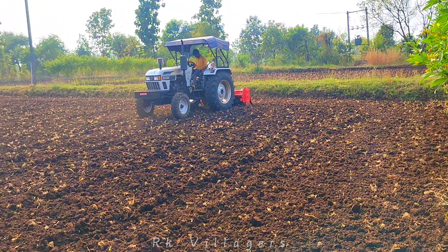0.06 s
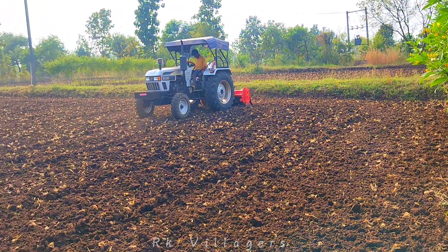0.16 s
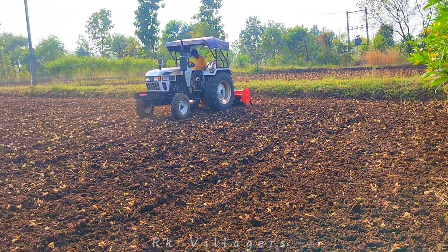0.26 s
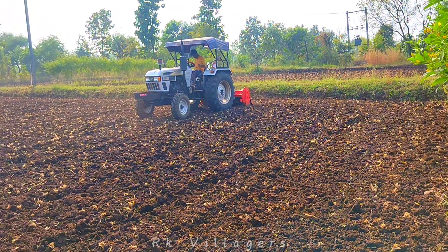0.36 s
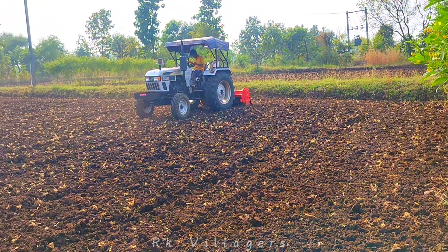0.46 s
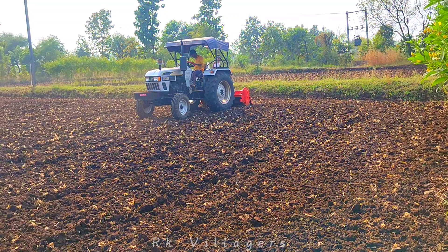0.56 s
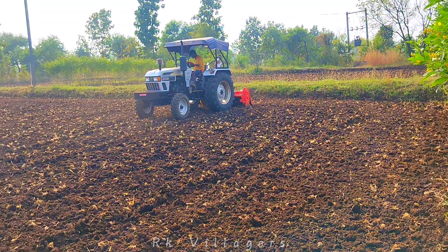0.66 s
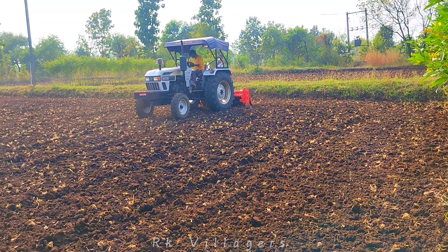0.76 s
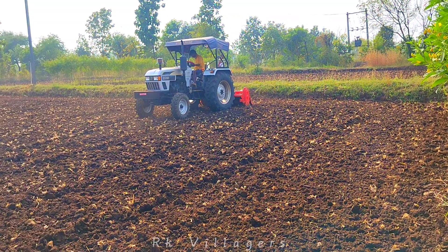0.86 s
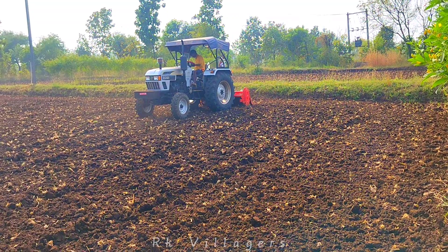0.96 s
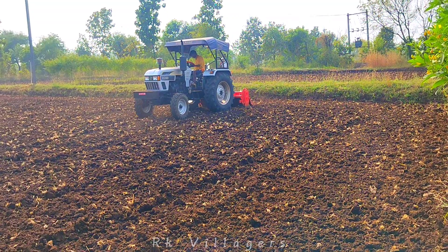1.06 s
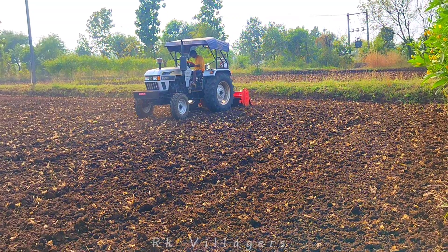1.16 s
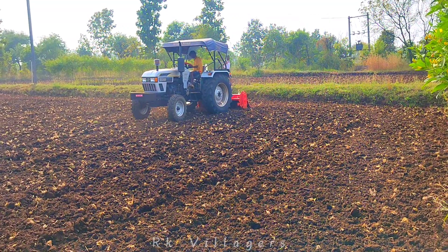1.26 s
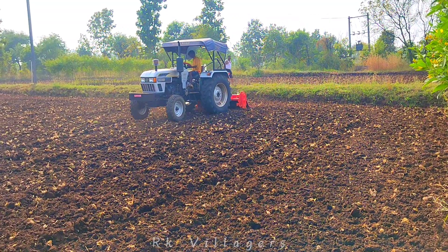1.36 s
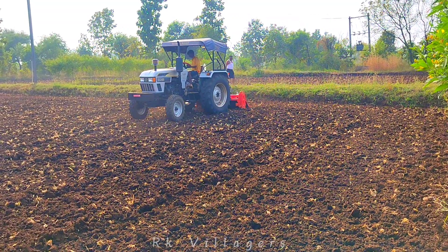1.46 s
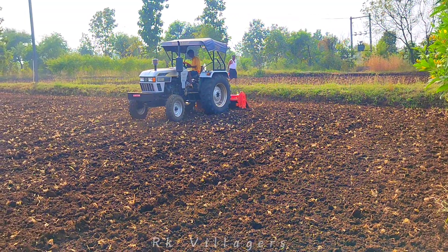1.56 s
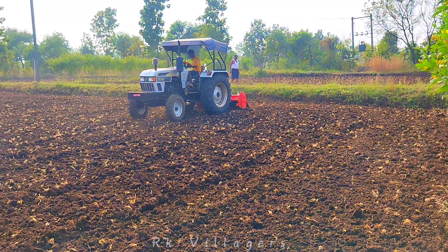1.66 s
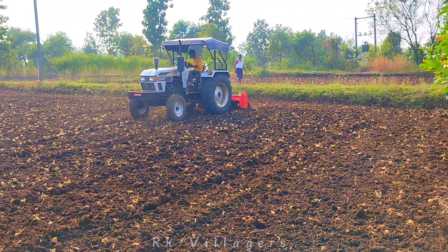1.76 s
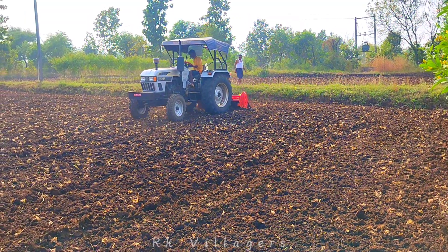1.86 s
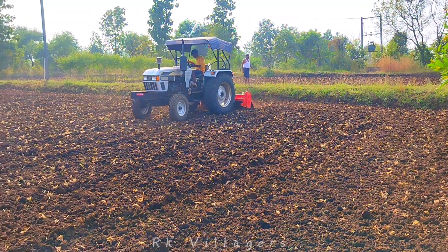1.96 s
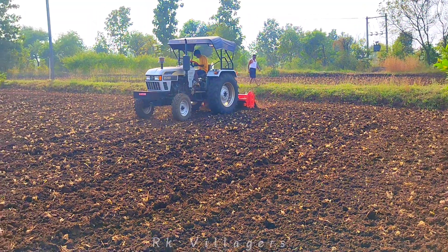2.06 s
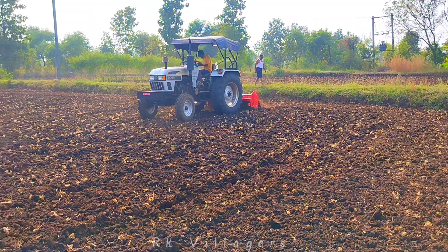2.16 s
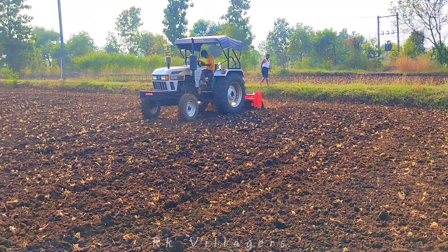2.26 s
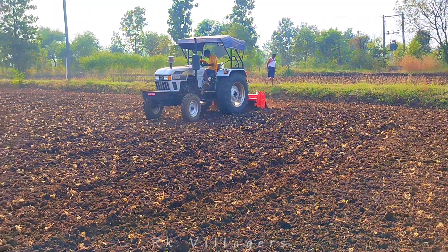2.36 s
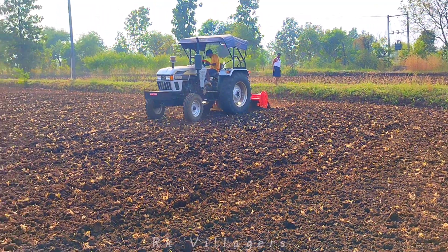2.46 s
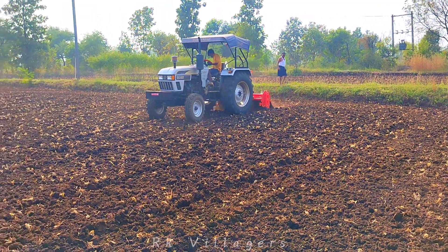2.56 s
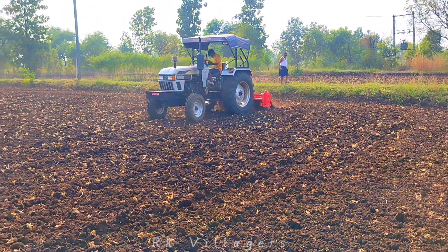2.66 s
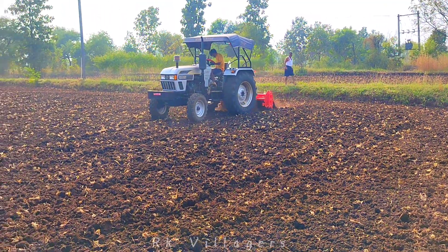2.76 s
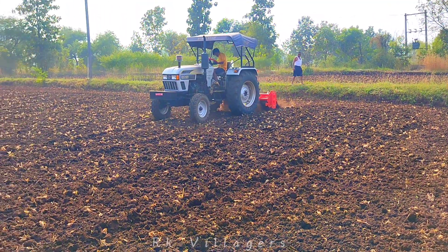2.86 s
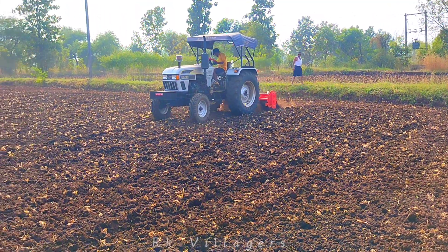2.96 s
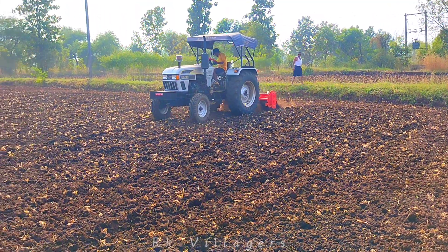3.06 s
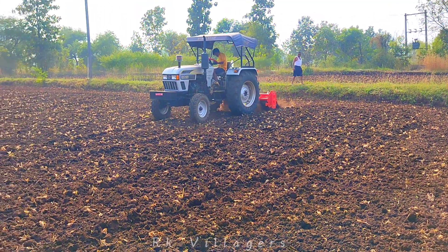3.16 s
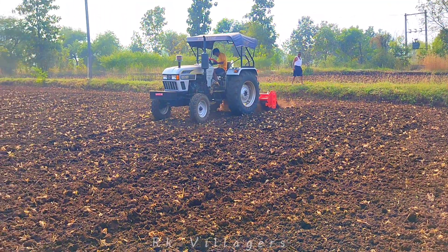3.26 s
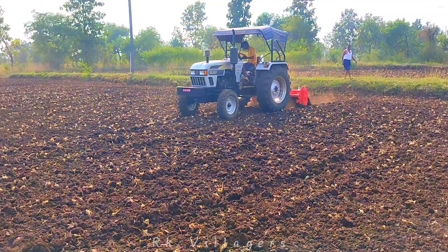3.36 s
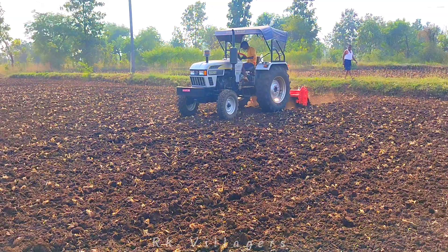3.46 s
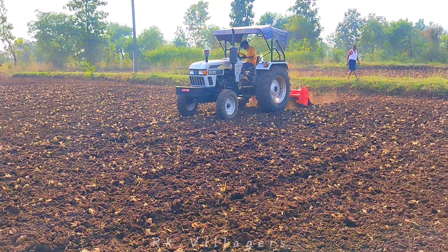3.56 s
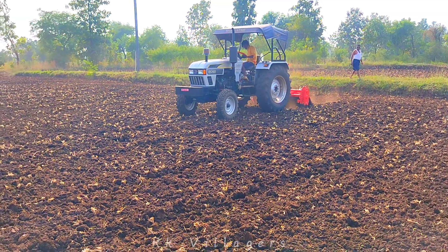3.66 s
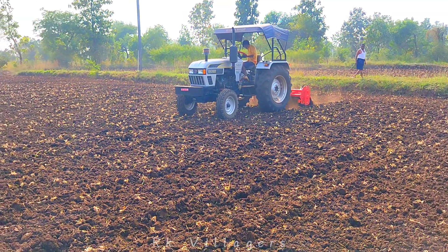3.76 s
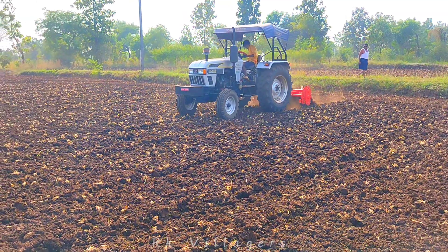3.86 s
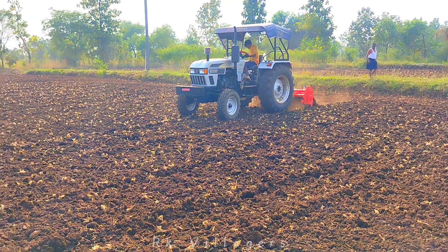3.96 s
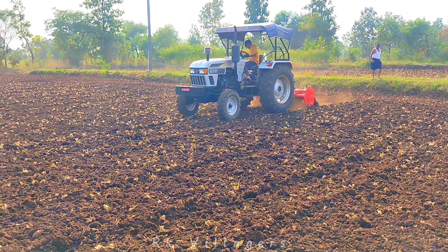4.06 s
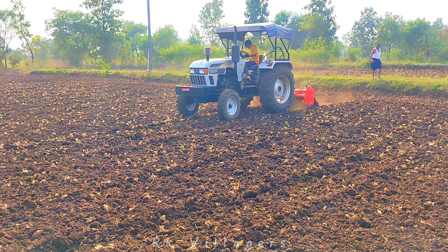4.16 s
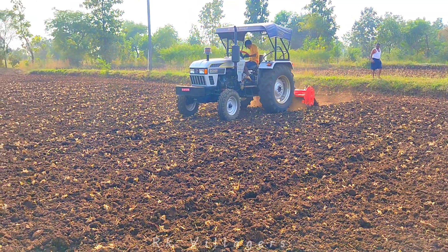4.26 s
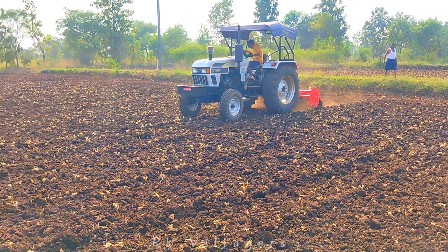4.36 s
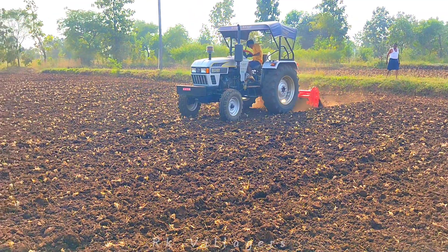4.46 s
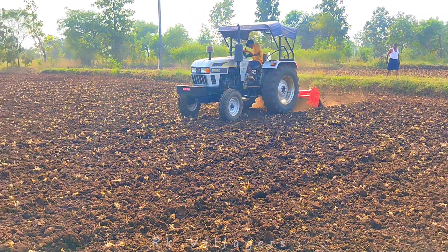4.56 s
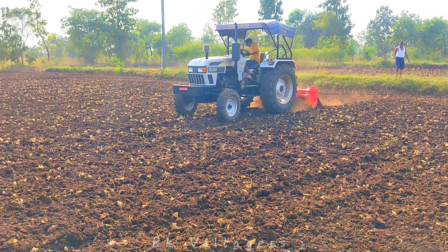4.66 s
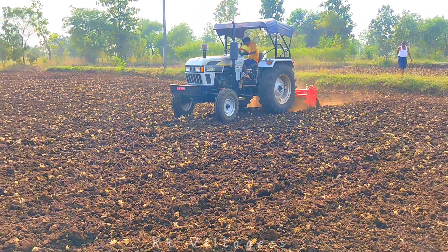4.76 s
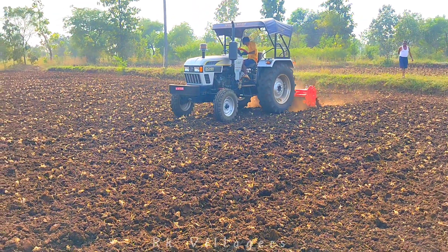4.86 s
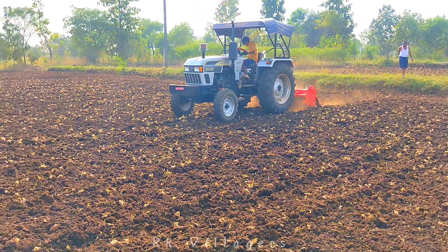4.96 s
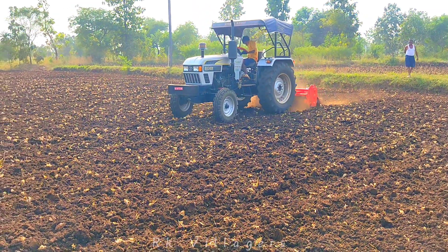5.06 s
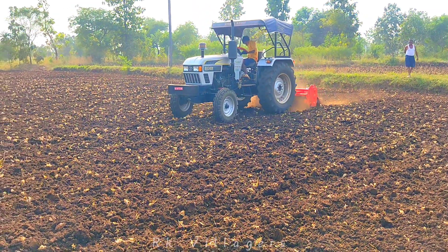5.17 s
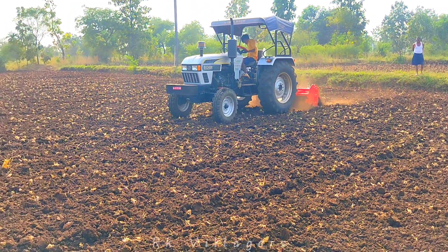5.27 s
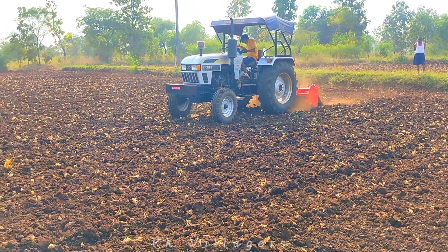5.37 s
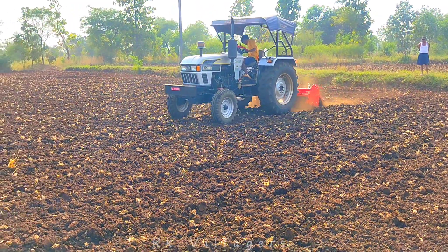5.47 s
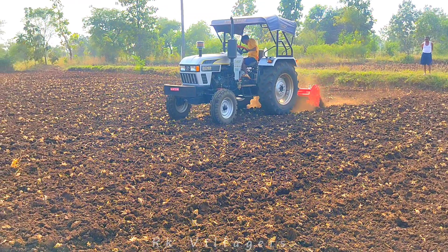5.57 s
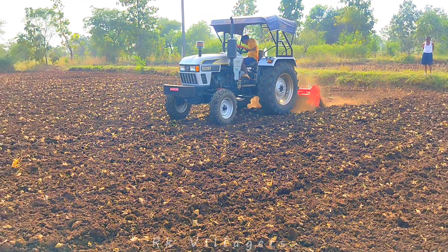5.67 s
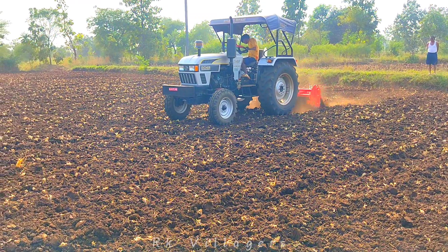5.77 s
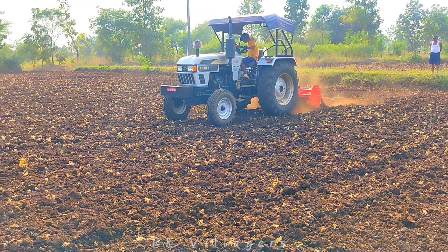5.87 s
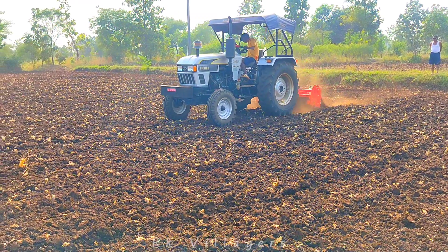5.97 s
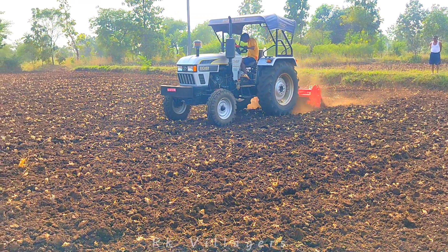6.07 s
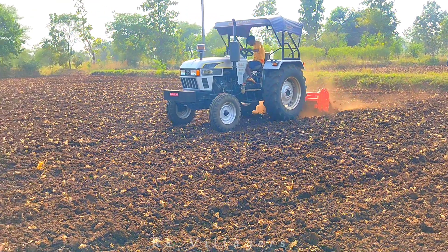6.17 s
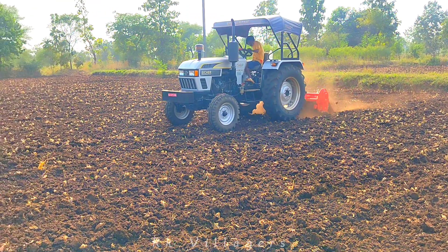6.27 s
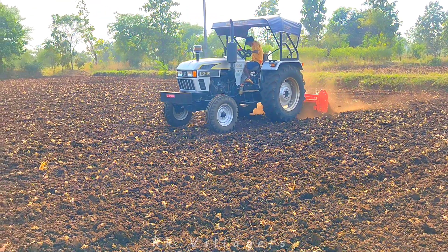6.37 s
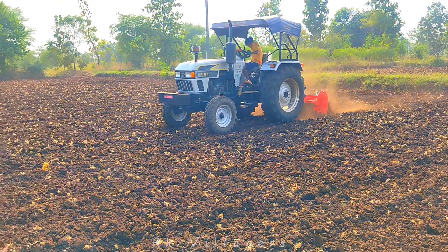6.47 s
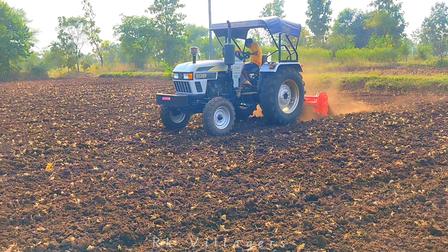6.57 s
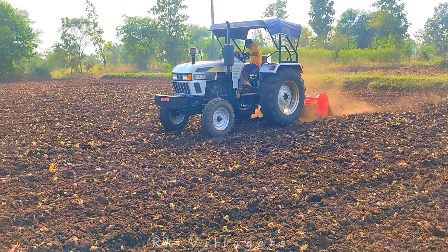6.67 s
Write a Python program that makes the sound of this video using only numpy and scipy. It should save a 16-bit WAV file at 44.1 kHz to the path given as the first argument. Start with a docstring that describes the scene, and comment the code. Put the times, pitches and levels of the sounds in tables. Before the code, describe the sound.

A three-cylinder diesel tractor idles lumpily in an open field, revs up hard with barking exhaust, eases briefly, then pulls steadily with a tiller.

```python
"""A three-cylinder diesel tractor with a rotary tiller idles in an open field, revs up, eases off its fuel
briefly and takes it up again, coming slowly closer throughout. Gas slugs ring silencer and stack, combustion
rings the cylinder head, and impacts ring block, chassis and panels. Gear teeth give wavering tones; fan and
soil give pulsed noise. A closely spaced microphone pair hears it from one side, with no walls around."""
import sys
import numpy as np
from scipy import signal
from scipy.fft import rfft, irfft, next_fast_len
from scipy.io import wavfile
from scipy.ndimage import uniform_filter1d, map_coordinates

SR = 44100
rng = np.random.default_rng(int(sys.argv[2]) if len(sys.argv) > 2 else 0)


def dump_mix(stems):
    """Bounce the given channels to the path in sys.argv[1] as a 16-bit WAV at rate SR."""
    frames = np.atleast_2d(stems).T  # one column per channel
    limited = np.clip(frames, -1, 1)  # hard clip at full scale
    pcm = np.round(limited * 32767).astype(np.int16)
    wavfile.write(sys.argv[1], SR, pcm)


N = 296330
TIME = np.arange(N) / SR
SIZE = next_fast_len(N + 8192)
FREQ = np.maximum(np.arange(SIZE // 2 + 1) * SR / SIZE, 1)  # Hz, kept above zero for the divisions
CYLINDERS = 3
WORKING_HZ = 37  # firings per second at working speed


def undb(db):
    """Level law: decibels to amplitude gain."""
    return 10 ** (np.asarray(db) / 20)


def unit(x):
    """Normalisation: scale to an rms of 1."""
    return x / np.sqrt(np.mean(x ** 2))


def curves(table):
    """Linear interpolation: each column of a time table at every sample."""
    seconds, *columns = np.transpose(table)
    return [np.interp(TIME, seconds, column) for column in columns]


def filtered(x, response):
    """Linear filtering: multiply the spectrum by a frequency response."""
    return irfft(rfft(x, SIZE) * response, SIZE)[..., :N]


def colour(points):
    """Spectral envelope: gain through (Hz, dB) points on a logarithmic pitch axis."""
    hz, db = np.transpose(points)
    return undb(np.interp(np.log(FREQ), np.log(np.maximum(hz, 1)), db))


def resonance(hz, width_hz, freq=FREQ):
    """Damped resonance: response of one mode, with gain 1 at its centre."""
    return 1 / (1 + 1j * (freq ** 2 - hz ** 2) / (freq * width_hz))


def body(modes):
    """Modal superposition: summed response of (Hz, width in Hz, dB) modes."""
    return sum(undb(db) * resonance(hz, width) for hz, width, db in modes)


def low_cut(hz):
    """Second-order high-pass response."""
    s = 1j * FREQ / hz
    return s * s / (s * s + np.sqrt(2) * s + 1)


def walk(rate):
    """Random modulation: a smooth drift, redrawn at a rate in Hz, with a spread near 1."""
    hold = int(SR / rate)
    steps = np.repeat(rng.standard_normal(N // hold + 1), hold)
    return 1.2 * uniform_filter1d(steps, hold)[:N]


def noise():
    """Turbulence: independent white noise for the direct and the scattered sound."""
    return rng.standard_normal((2, N))


def strokes(turn, place, rise, fall, scatter_db):
    """Periodic excitation: one Gaussian swell per unit of turn, its lengths in that unit, its strength random."""
    nearest = np.round(turn - place).astype(int)
    offset = turn - place - nearest
    size = undb(scatter_db * rng.uniform(-1.5, 1.5, 512))[nearest]
    return size * np.exp(-.5 * (offset / np.where(offset < 0, rise, fall)) ** 2)


def cylinder_gain(turn, cylinder_db):
    """Unequal firing: each cylinder in turn has its own gain."""
    return undb(np.asarray(cylinder_db)[np.round(turn).astype(int) % CYLINDERS])


def repeating_taps(turn, slop, count):
    """Cyclic impacts: sharp contacts return at the same crank angles each working cycle, a little loosely."""
    cycles = np.arange(-1, turn[-1] / CYLINDERS + 1)[:, None]
    places = (np.arange(count) + rng.random(count)) / count
    angles = CYLINDERS * (cycles + places) + slop * rng.standard_normal((len(cycles), count))
    sizes = rng.choice([-1, 1], count) * undb(0.46 * rng.standard_normal(angles.shape))
    inside = (angles > turn[0]) & (angles < turn[-1])
    return np.bincount(np.searchsorted(turn, angles[inside]), sizes[inside], N)


def exhaust_thump(turn, hz):
    """Pulsed flow: gas slugs ring the silencer, and the steep front of each escapes directly."""
    force = cylinder_gain(turn, cylinder_db=[-.6, .1, .7])
    # lengths in seconds times hz give lengths in firing intervals
    slug = strokes(turn, place=.01, rise=.0025 * hz, fall=.002 * hz, scatter_db=.45) * force
    front = strokes(turn, place=-0.013, rise=0.00097 * hz, fall=0.0015 * hz, scatter_db=1.2) * force
    silencer = (resonance(50.5, 25) + undb(-1.2) * resonance(98, 54)) * low_cut(32)
    wave = filtered(slug, silencer) + undb(-14.5) * filtered(front, resonance(124, 660))
    return unit(wave / hz ** 0.12)


# Silencer chambers, each a resonance passed twice.
# Each row: centre in Hz, width of one pass in Hz, level in dB.
CHAMBER_MODES = [(373, 118, 0.5), (296, 48, -15), (766, 230, -4.5), (1194, 210, -8.5)]


def exhaust_bark(turn, hz):
    """Cavity resonance: the tail of each slug kicks the silencer chambers and flutters in them."""
    kick = strokes(turn, place=.03, rise=.00012 * hz, fall=.00012 * hz, scatter_db=1.5)
    after = strokes(turn, place=.05, rise=.003 * hz, fall=.0028 * hz, scatter_db=1)
    chambers = sum(undb(db) * resonance(pitch, width) ** 2 for pitch, width, db in CHAMBER_MODES)
    ring = unit(filtered(kick, chambers)) * [[1], [0]]  # direct sound only
    flutter = unit(filtered(noise() * after, chambers))
    return unit(ring + undb(-3) * flutter)


# Stack resonances rung by the gas jet, before their scatter from firing to firing.
# Each row: centre in Hz, width in Hz, level in dB.
STACK_MODES = [(790, 170, 4), (2590, 126, 6), (3165, 180, 1.5), (3630, 200, 4.5), (4220, 280, -4),
               (4810, 300, -0.5), (5310, 146, -4.5), (3550, 910, -8.5)]
HEAT_SPREAD, JET_COLOUR_DB = .025, 1.5  # scatter per firing: share of pitch by gas heat, level of each mode
JET_TAIL_DB, JET_TAIL_S = -11, .017  # sound of the jet scattered back by the clods: level, decay time


def exhaust_spit(turn, size=2048):
    """Pipe resonance: a short turbulent jet rings the stack, each time with its own pitches and colour."""
    lead_in = size // 8
    t = (np.arange(size) - lead_in) / SR
    freq = np.maximum(np.arange(size // 2 + 1) * SR / size, 1)
    burst = np.exp(-.5 * (t / np.where(t < 0, .001, .0025)) ** 2)
    tail = (t > 0) * undb(JET_TAIL_DB) * np.exp(-abs(t) / JET_TAIL_S)
    jet = burst + tail
    starts = np.searchsorted(turn, np.arange(1, turn[-1]) - .055)
    out = np.zeros((2, N + size))
    for start in starts:
        heat, strength = np.clip(rng.standard_normal((2, len(STACK_MODES))), -2, 2)
        stack = 0
        for (pitch, width, db), h, s in zip(STACK_MODES, heat, strength):
            heated = pitch * (1 + HEAT_SPREAD * h)
            # the second, broader pass steepens the skirts
            mode = resonance(heated, width, freq) * resonance(heated, min(5 * width, 2600), freq)
            stack = stack + undb(db + JET_COLOUR_DB * s) * mode
        ring = irfft(rfft(jet * rng.standard_normal((2, size))) * stack, size)
        out[:, start:start + size] += unit(ring) * undb(rng.uniform(-1.6, 1.6))
    return unit(out[:, lead_in:lead_in + N])


def exhaust_hiss(turn, hz):
    """Jet noise: turbulence hisses at the lip of the stack with each slug."""
    jet = strokes(turn, place=-.008, rise=0.002 * hz, fall=0.0021 * hz, scatter_db=2.5)
    return unit(filtered(noise() * jet, resonance(8740, 3600) ** 2))


# Firings whose spit and hiss crack much harder than the rest.
# Each row: time in seconds, extra level in dB.
HARD_CRACKS = [(1.491, 4), (1.778, 3), (2.301, 3), (2.457, 2), (2.659, 5), (2.715, 3), (2.769, 2)]


def hard_firings(turn):
    """Irregular combustion: extra gain over each firing that cracks."""
    firing = np.round(turn)
    return undb(sum(db * (firing == np.round(np.interp(s, TIME, turn))) for s, db in HARD_CRACKS))


# Cylinder head modes rung by combustion, before the overall colouring.
# Each row: centre in Hz, width in Hz, level in dB.
HEAD_MODES = [(759, 16.5, 19.5), (833, 29, 22), (1210, 77, 6.5), (1387, 150, 5.5), (1543, 18, 8),
              (1910, 88, -6)]
# How hard each cylinder knocks. Each entry: level in dB at 19 firings per second.
KNOCK_BALANCE_DB = [-5, -1, 0]


def knock(turn, hz):
    """Impulsive combustion: a jolt rings the head before a brief rough burn; cylinders even out with speed."""
    uneven = cylinder_gain(turn, KNOCK_BALANCE_DB) ** (19 / hz) / np.sqrt(hz)
    jolt = strokes(turn, place=.255, rise=.00012 * hz, fall=.00012 * hz, scatter_db=.7)
    burn = strokes(turn, place=.285, rise=.0018 * hz, fall=.0035 * hz, scatter_db=.7)
    ring = unit(filtered(jolt * uneven, body(HEAD_MODES) * resonance(1420, 1370) ** 2))
    rough = resonance(1420, 980) ** 2 + undb(-38) * resonance(9200, 5000) ** 2
    rasp = unit(filtered(noise() * burn * uneven, rough))
    return unit(ring * [[1], [0]] + undb(-6) * rasp)  # the ring is direct sound only


# Block and bonnet modes, before the overall colouring.
# Each row: centre in Hz, width in Hz, level in dB.
BLOCK_MODES = [(392, 29, -3.5), (632, 73, -2), (721, 64, 1), (768.6, 22, 3), (815, 18, -4),
               (1123, 54, -5.5), (1206, 58, -11), (1340, 54, -3), (2017, 26, -7)]
# Piston and valve impacts within one firing interval. Each row: place from 0 to 1,
# length in intervals, level in dB at working speed, change in dB per octave of speed.
IMPACT_SWELLS = [(.11, 0.079, 3.5, 6.5), (.29, 0.042, 1, 26), (.51, 0.15, 0.5, -8),
                 (.86, 0.044, -1.5, -6.5)]


def clatter(turn, hz):
    """Structure-borne impact: pistons and valves strike the block, partly cyclically and partly at random."""
    octaves = np.log2(hz / WORKING_HZ)
    force = undb(-13.5)
    for place, length, db, octave_db in IMPACT_SWELLS:
        force = force + undb(db + octave_db * octaves) * strokes(turn, place, length, length, scatter_db=1.5)
    contacts = unit(repeating_taps(turn, slop=.002, count=60)) + undb(-5.0) * noise()
    return unit(filtered(contacts * force, body(BLOCK_MODES) * resonance(710, 1900) * low_cut(297)))


def intake(turn):
    """Pulsed suction: pistons gulp air between firings and keep the air cleaner and its pipe humming."""
    gulp = strokes(turn, place=.55, rise=.26, fall=.053, scatter_db=.5)
    cleaner = resonance(39.8, 6.5) + undb(-1) * resonance(95, 14) + resonance(132, 22)
    return unit(filtered(gulp, cleaner * low_cut(30)))


# Chassis modes, before the overall colouring.
# Each row: centre in Hz, width in Hz, level in dB.
FRAME_MODES = [(94, 19, 5), (131, 30, -1), (221.6, 16.4, -4), (262.5, 21, -8.5), (603.5, 32, -4.5)]


def frame_drone(turn):
    """Forced modal vibration: shakes that recur in every working cycle keep the chassis droning."""
    shakes = repeating_taps(turn, slop=.002, count=40)
    return unit(filtered(shakes, body(FRAME_MODES) * low_cut(70) * resonance(220, 900)))


def clunk(turn, hz):
    """Damped impact: one loose part clunks dully once in each working cycle."""
    blow = strokes(turn / CYLINDERS, place=.22, rise=.00008 * hz, fall=.00008 * hz, scatter_db=1.5)
    return unit(filtered(blow, resonance(385, 90) ** 2 + undb(-5) * resonance(300, 70) ** 2))


# Gear and pump tones. Each row: cycles per firing, mean level in dB before the growth with speed.
MESH_TONES = [(50 / 3, 2), (56 / 3, 2), (64 / 3, -.5), (22.8, 1), (30, 3), (40.2, -7)]


def gear_whine(turn, hz):
    """Tooth meshing: tones locked to the crank waver in level and phase and grow steeply with speed."""
    mesh = 0
    for order, db in MESH_TONES:
        level = undb(db + 2 * walk(10))
        mesh = mesh + level * np.sin(2 * np.pi * order * turn + .7 * walk(25))
    return unit(mesh * hz ** 4)


def injectors(turn):
    """Pulsed turbulence: a thin sizzle from the fuel pump ahead of each firing."""
    shot = strokes(turn, place=0.76, rise=0.07, fall=0.1, scatter_db=1)
    pipes = undb(5) * resonance(3850, 1500) ** 2 + resonance(9100, 3000) ** 2
    pipes = pipes + undb(-5) * resonance(11000, 2500)
    return unit(filtered(noise() * shot, pipes * low_cut(3400)))


# Light panels shaken by the engine. Each row: centre in Hz, width in Hz, level in dB.
PANEL_MODES = [(2000, 180, 3), (2460, 160, -6.5), (3560, 33, -2), (5300, 41, -5), (8700, 840, -17)]


def panels(turn):
    """Sympathetic rattle: light panels buzz against their fastenings, a little harder after each firing."""
    shake = 1 + undb(-3.0) * strokes(turn, place=0.24, rise=0.11, fall=0.87, scatter_db=5.5)
    contacts = unit(repeating_taps(turn, slop=0.0013, count=90)) + undb(21.0) * noise()
    return unit(filtered(contacts * shake, body(PANEL_MODES) * low_cut(1480)))


# Spectral envelope of the fan and tiller rush. Each row: frequency in Hz, filter gain in dB.
RUSH_COLOUR = [(100, 12), (200, 3), (400, 2.5), (470, 3.5), (600, 6.5), (1000, 3.5), (1450, 0.5),
               (1650, -1), (2000, -3.5), (2850, -6), (5300, -10), (6400, -11.5), (10700, -12.5),
               (12500, -17.5), (16000, -17)]


def rush(turn):
    """Modulated broadband noise: fan air and crumbling soil, grainy and pulsing with the engine."""
    grit = undb(1.52 * walk(700) + 0.75 * walk(9.9))
    pulse = 1 + .35 * strokes(turn, place=.1, rise=.2, fall=.27, scatter_db=4)
    return unit(filtered(noise() * grit * pulse, colour(RUSH_COLOUR) * low_cut(67)))


SURGE_LAG_S = .17  # memory of the running fuel average


def surge(fuel):
    """Transient enrichment: how far the fuel has just risen above its recent average."""
    keep = np.exp(-1 / (SURGE_LAG_S * SR))
    return np.maximum(fuel - signal.lfilter([1 - keep], [1, -keep], fuel), 0)


FAR_M, APPROACH_M_S = 25.5, 0.75  # distance at the start, and how fast it shrinks


def loudness(law, fuel, hz):
    """Inverse distance law: gain rises as the tractor nears, and follows fuel and engine speed."""
    full_db, fuel_db, octave_db, approach_db = law
    closer_m = APPROACH_M_S * TIME
    db = full_db + fuel_db * (fuel - 1) + octave_db * np.log2(hz / WORKING_HZ) + approach_db * closer_m
    return undb(db) * FAR_M / (FAR_M - closer_m)


# The microphone pair. Each row: frequency in Hz, gain in dB, nominal left minus right level in dB,
# phase lead of the left in radians, likeness from 0 to 1 before a ceiling just under 1.
PAIR_RESPONSE = [(200, 0.5, -0.78, 0, 1), (760, 1.3, -0.1, 0, 0.95), (1300, 3.5, -1.8, 0.9, 1),
                 (2040, 4.5, -0.3, 1.84, 0.34), (2800, 2, -1.3, 4, 0.23), (3620, 1.5, -2.2, 4.5, 0.3),
                 (5500, 1.5, -4, 6.5, 0.36), (8500, 3, -0.7, 7, .3), (10900, 2.5, 6.5, 7, 0),
                 (15000, 2, -4, 6.5, 0.65)]
# Echo cancellations at each microphone. Each row: centre in Hz, width in Hz, depth from 0 to 1.
LEFT_ECHO_DIPS = [(460, 89, 0.83), (963, 170, 0.57), (1540, 370, 0.75), (2090, 300, 0.38)]
RIGHT_ECHO_DIPS = [(552, 190, 0.37), (1254, 380, 0.52), (1737, 265, 0.82), (2660, 230, 0.39)]
# The tractor starts further to the left. Each row: time in seconds, extra delay at the right in seconds.
BEARING_DELAY = [(0, .00009), (3.7, 0)]


def microphones(direct, scattered):
    """Spaced-pair stereo: the left leads, echoes cancel different pitches, and scatter sets the two apart."""
    hz, *columns = np.transpose(PAIR_RESPONSE)
    db, lean_db, lead, likeness = (np.interp(np.log(FREQ), np.log(hz), column) for column in columns)
    likeness = np.clip(likeness, 0, .9995)
    shared, apart = np.sqrt((1 + likeness) / 2), np.sqrt((1 - likeness) / 2)
    pair = []
    for sign, dips, delay in ((0.97, LEFT_ECHO_DIPS, 1), (-1.01, RIGHT_ECHO_DIPS, np.exp(-1j * lead))):
        echo = np.prod([1 - depth * resonance(pitch, width) for pitch, width, depth in dips], axis=0)
        port = echo * delay * undb(db + sign * lean_db / 2)
        pair.append(filtered(direct, port * shared) + sign * filtered(scattered, port * apart))
    late_s, = curves(BEARING_DELAY)
    right = map_coordinates(pair[1], [(TIME - late_s) * SR], order=5, mode="mirror")
    return np.array([pair[0], right])


# Engine speed: idle, a steady run-up, then working speed. Each row: time in seconds, firings per second.
ENGINE_SPEED = [(0, 19.458), (.6, 19.003), (1, 19.549), (1.2, 18.922), (1.45, 22.569), (1.9, 26.922),
                (2.82, 37.847), (3.1, 37.994), (3.4, 37.204), (4.4, 36.98), (4.9, 37.307), (5.9, 36.687),
                (6.3, 37.068), (6.72, 36.649)]
# Fuel: high for the run-up, cut back at top speed, then returning. Each row: time in seconds, fuel from 0 to 1.
FUEL = [(0, 0.06), (.45, 0.02), (.8, 0.2), (1.42, 0.85), (2.1, 0.87), (2.7, 0.85), (3.2, 0.38),
        (3.65, 0.66), (4.4, 0.77), (6.72, 0.76)]
# Loudness of each part. Each row: level in dB at full fuel, working speed and the starting distance,
# dB per unit of fuel, dB per octave of speed, dB per metre of approach besides the distance law.
THUMP_LOUDNESS = (-15.2, 14.8, 4.4, 0)
BARK_LOUDNESS = (-30, 28, 6.5, -0.36)
SPIT_LOUDNESS = (-33.6, 26, -1.5, .6)
HISS_LOUDNESS = (-47, 24, -2.5, 2.2)
KNOCK_LOUDNESS = (-39, 3.5, 1.5, -.5)
CLATTER_LOUDNESS = (-31.5, 1.5, 11.5, 0)
INTAKE_LOUDNESS = (-23.3, 6, 4, 0)
FRAME_LOUDNESS = (-36, 5.5, 2, 0)
CLUNK_LOUDNESS = (-48, 0, 3, 0)
WHINE_LOUDNESS = (-42, 12.5, 39, 1.6)
INJECTOR_LOUDNESS = (-49, -0.5, 5, -0.5)
PANEL_LOUDNESS = (-38.5, 0.5, 13, 0.32)
RUSH_LOUDNESS = (-31.5, 8, 3, 1.39)
START_TURN = .79  # crank position at the start, in firings
SLUG_ONSET = .13  # fuel at which the gas slugs reach most of their weight
SURGE_KNOCK_DB, SURGE_CLATTER_DB = 22, 26  # a sudden dose of fuel burns harshly: dB per full dose


def scene():
    """Common excitation: one crank angle times every engine part; fuel, speed and distance set the levels."""
    hz, = curves(ENGINE_SPEED)
    fuel, = curves(FUEL)
    turn = START_TURN + np.cumsum(hz) / SR  # counts firings
    harsh = surge(fuel)
    weight = 1 - .8 * np.exp(-fuel / SLUG_ONSET)  # an idling engine hardly thumps
    crack = hard_firings(turn)
    parts = [(exhaust_thump(turn, hz) * weight, THUMP_LOUDNESS),
             (exhaust_bark(turn, hz), BARK_LOUDNESS),
             (exhaust_spit(turn) * weight * crack, SPIT_LOUDNESS),
             (exhaust_hiss(turn, hz) * weight * crack, HISS_LOUDNESS),
             (knock(turn, hz) * undb(SURGE_KNOCK_DB * harsh), KNOCK_LOUDNESS),
             (clatter(turn, hz) * undb(SURGE_CLATTER_DB * harsh), CLATTER_LOUDNESS),
             (intake(turn), INTAKE_LOUDNESS),
             (frame_drone(turn), FRAME_LOUDNESS),
             (clunk(turn, hz), CLUNK_LOUDNESS),
             (gear_whine(turn, hz), WHINE_LOUDNESS),
             (injectors(turn), INJECTOR_LOUDNESS),
             (panels(turn), PANEL_LOUDNESS),
             (rush(turn), RUSH_LOUDNESS)]
    direct, scattered = sum(part * loudness(law, fuel, hz) for part, law in parts)
    return microphones(direct, scattered)


TOP_HZ = 15700  # upper band edge


def record(dry):
    """Band limiting: the recorder drops the deepest rumble and cuts the top steeply."""
    lean = filtered(dry, 1 / np.sqrt(1 + (28 / FREQ) ** 12))
    return signal.sosfilt(signal.ellip(10, .2, 80, TOP_HZ, fs=SR, output="sos"), lean)


dry = scene()
out = record(dry)
dump_mix(out)
```